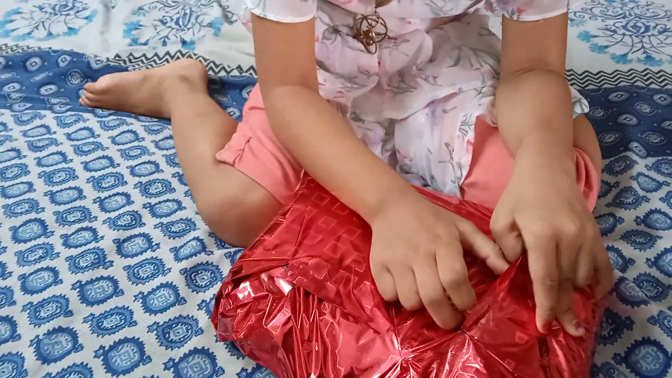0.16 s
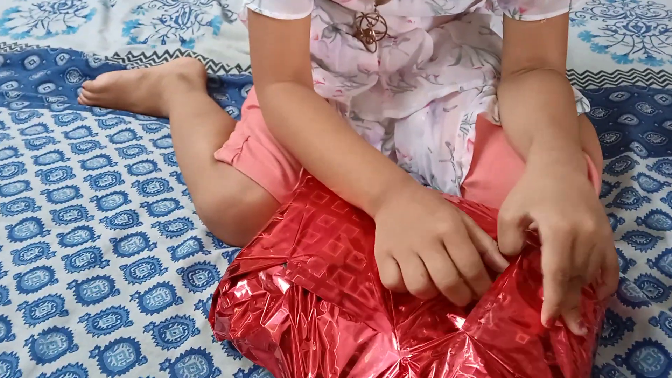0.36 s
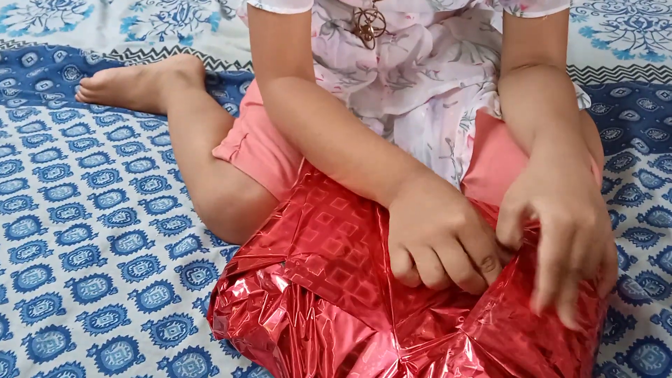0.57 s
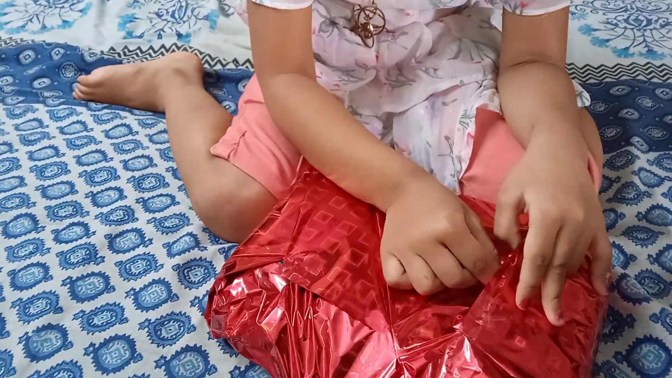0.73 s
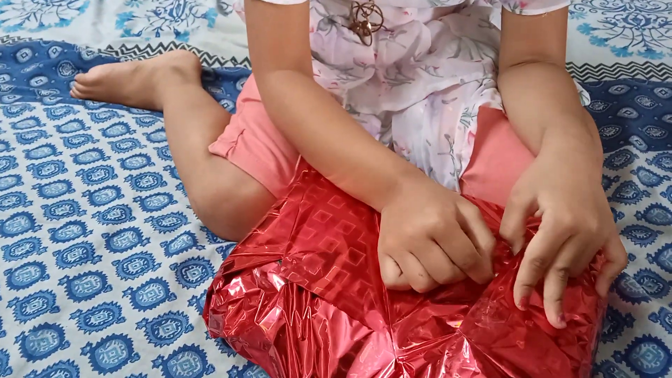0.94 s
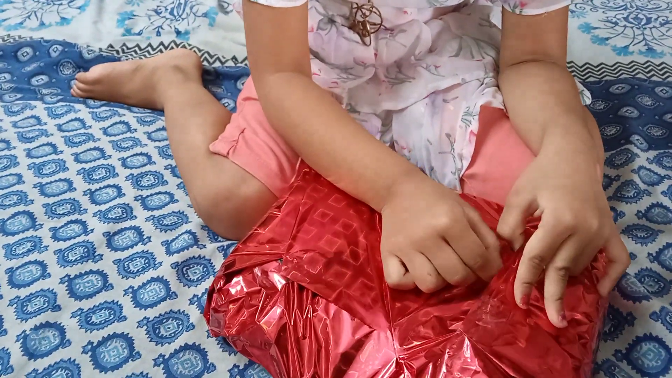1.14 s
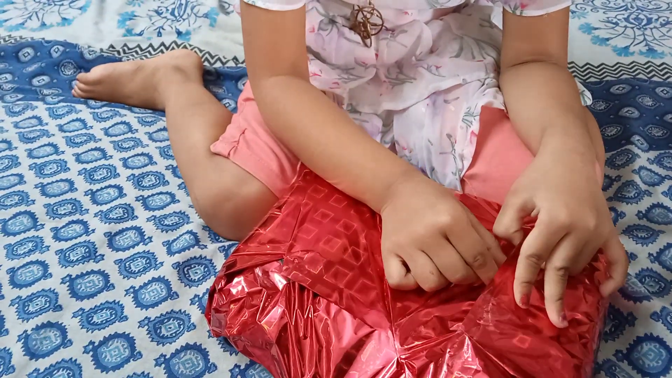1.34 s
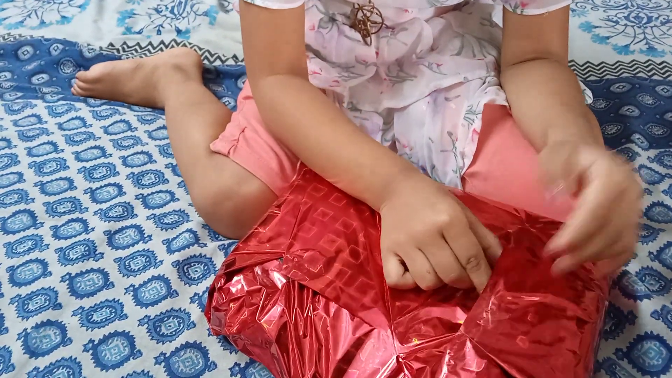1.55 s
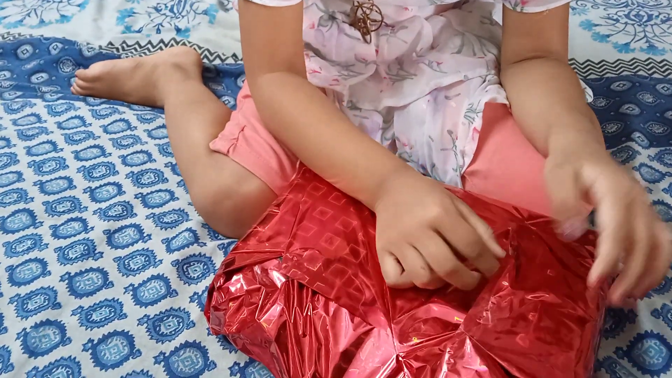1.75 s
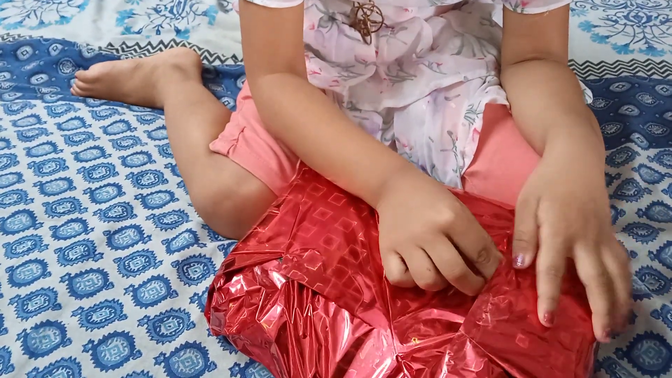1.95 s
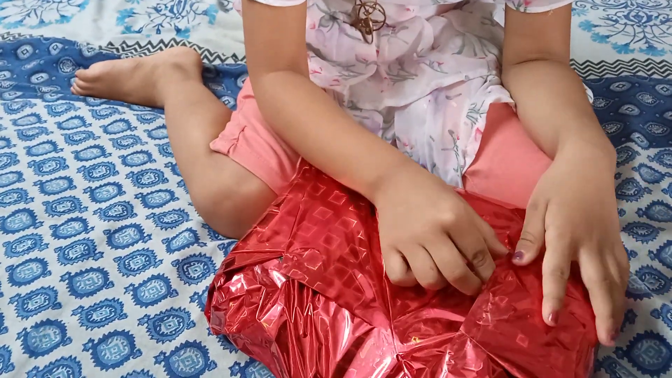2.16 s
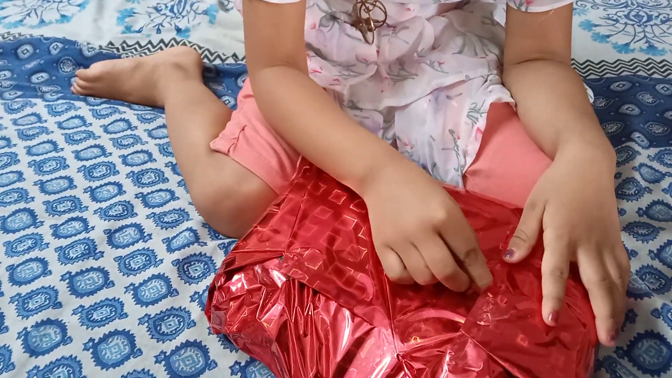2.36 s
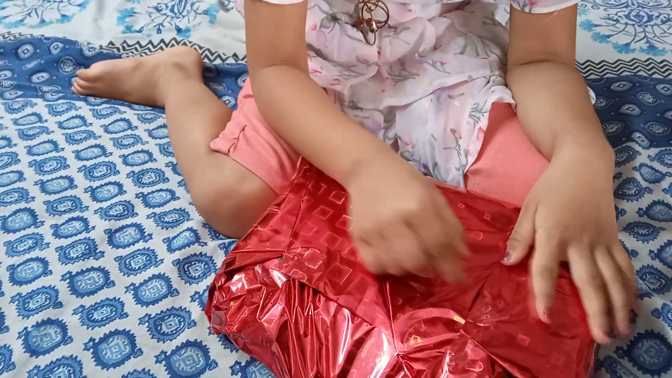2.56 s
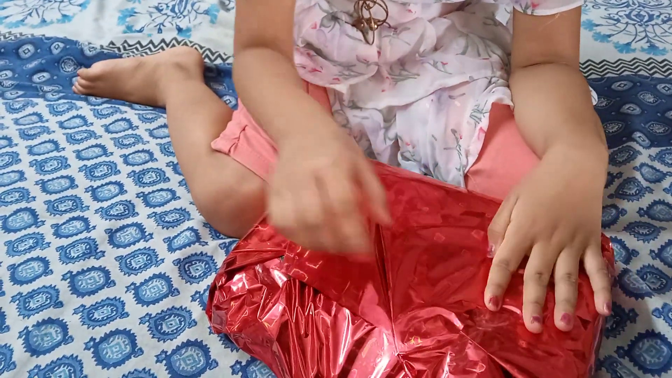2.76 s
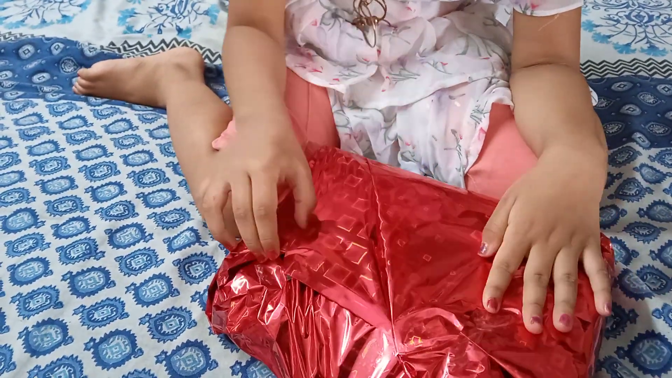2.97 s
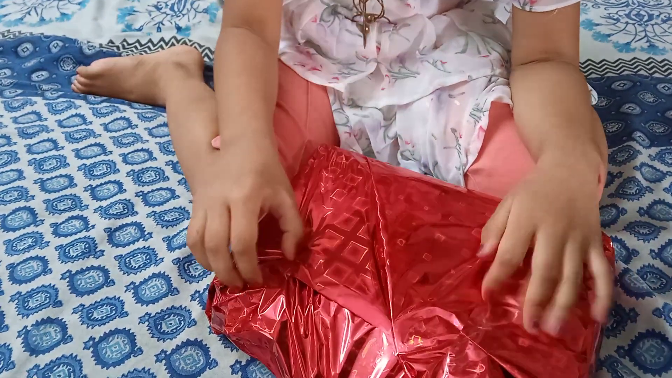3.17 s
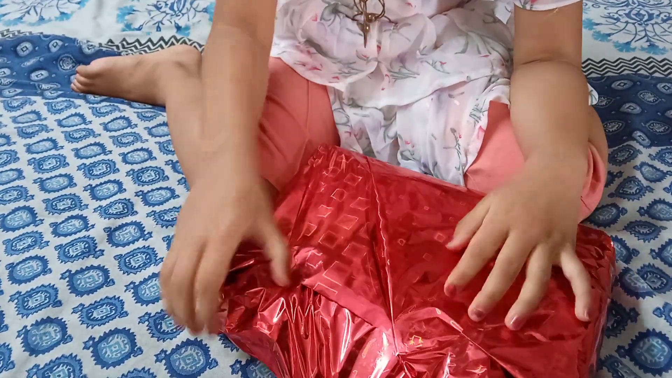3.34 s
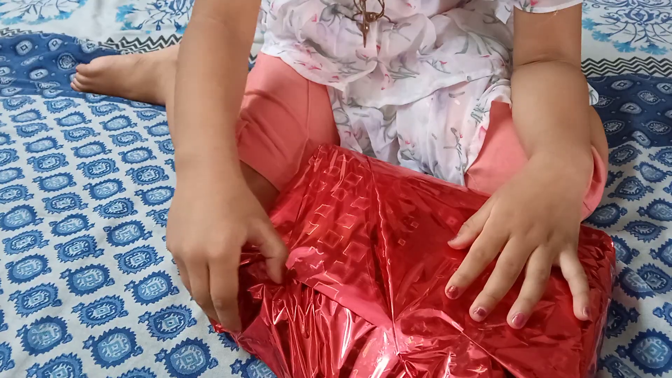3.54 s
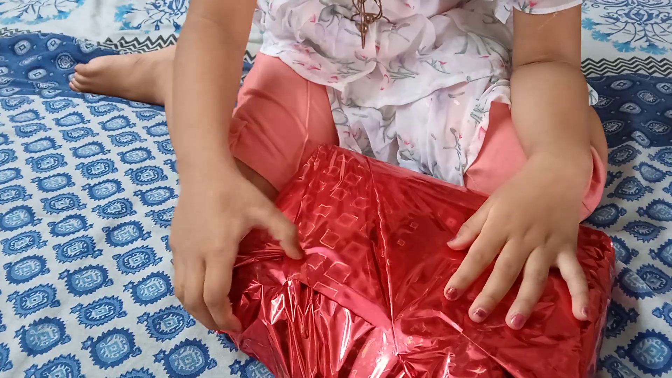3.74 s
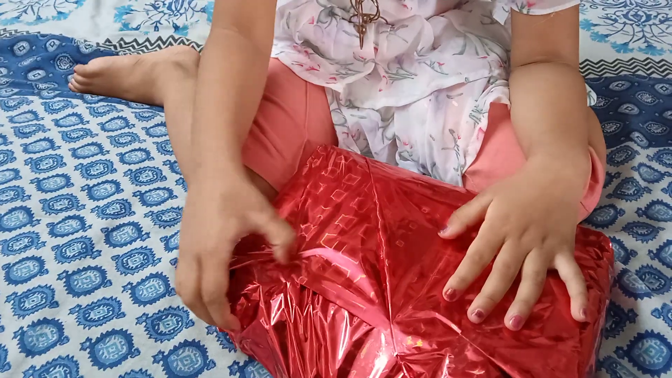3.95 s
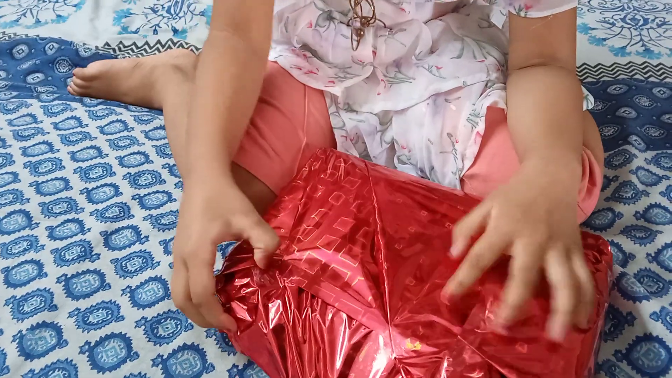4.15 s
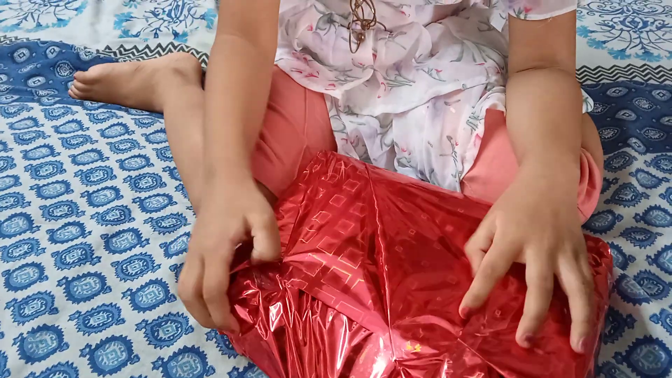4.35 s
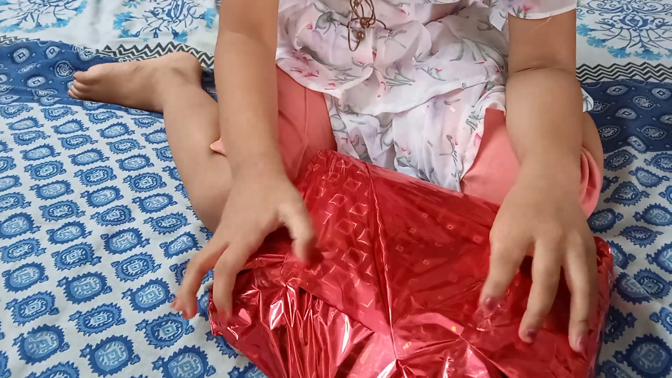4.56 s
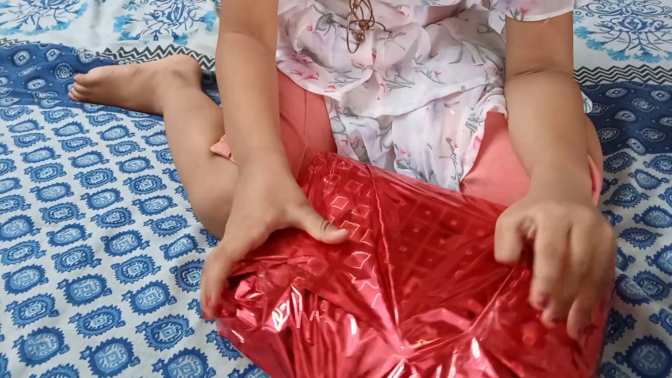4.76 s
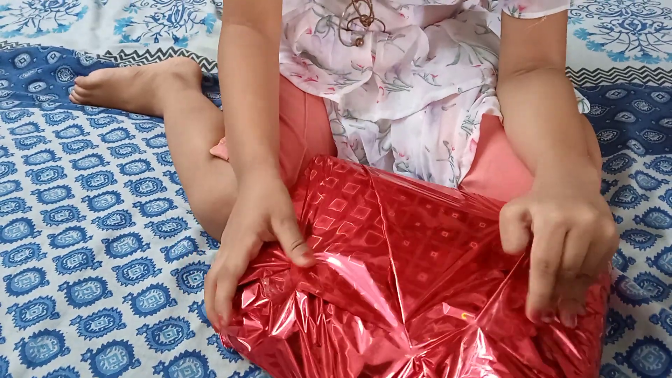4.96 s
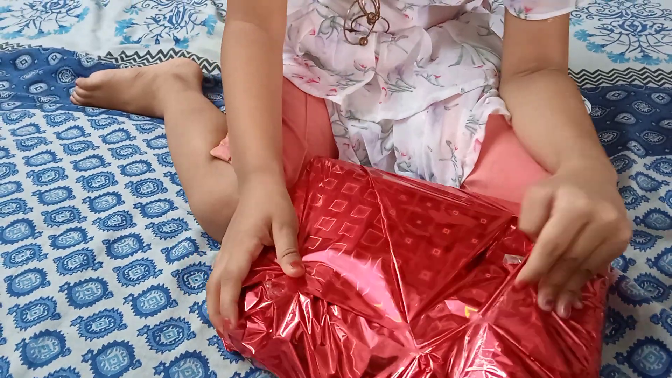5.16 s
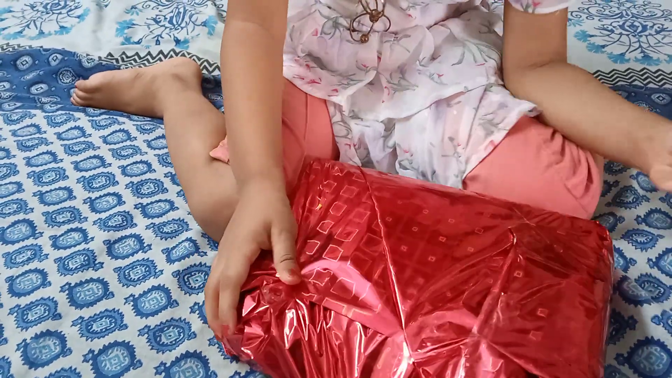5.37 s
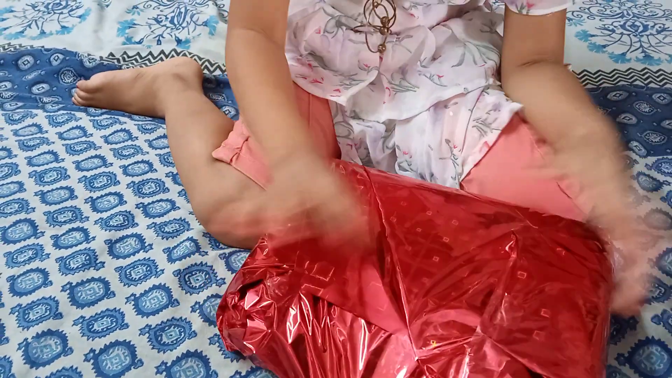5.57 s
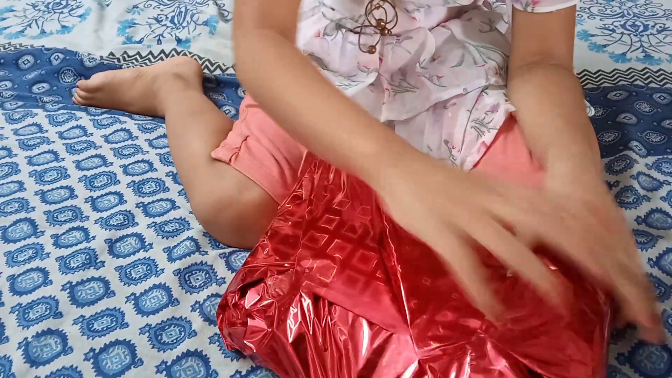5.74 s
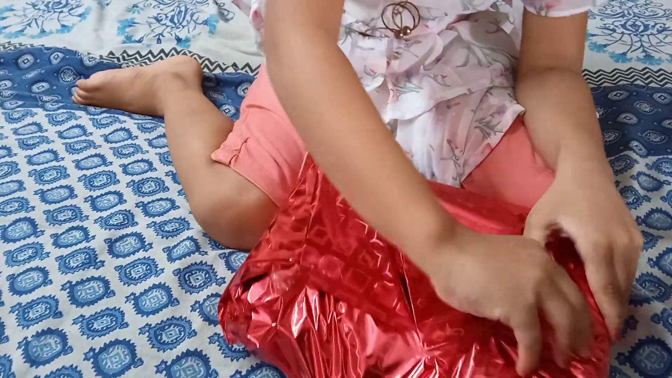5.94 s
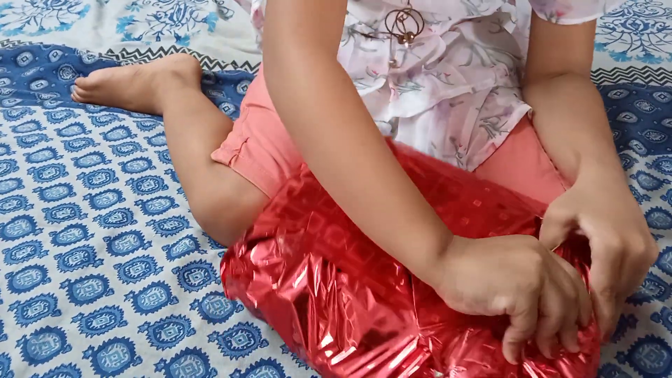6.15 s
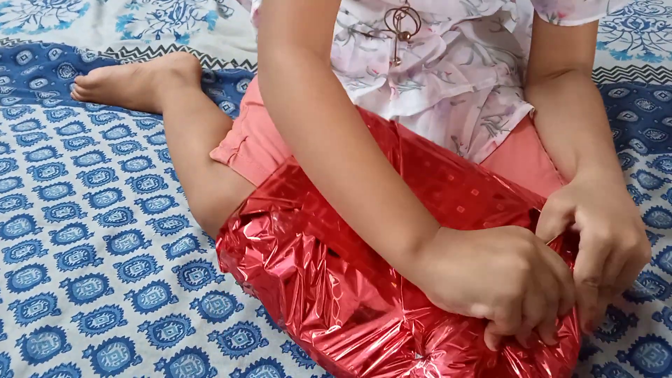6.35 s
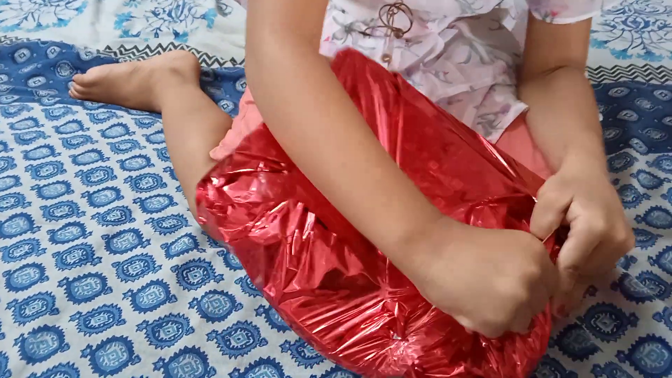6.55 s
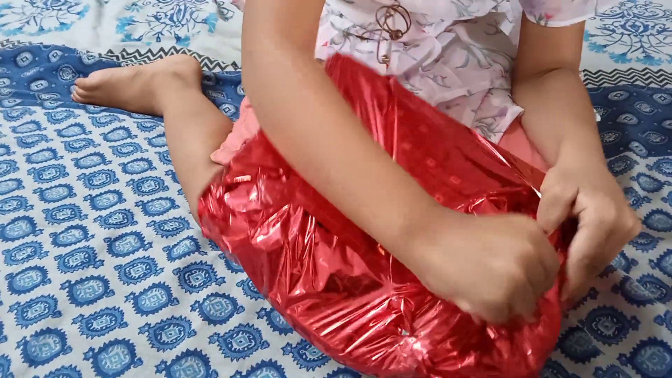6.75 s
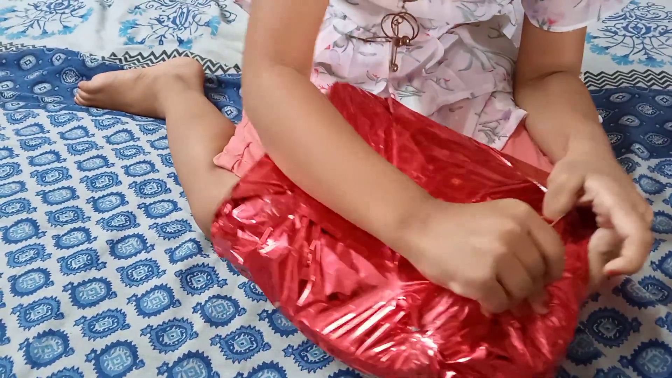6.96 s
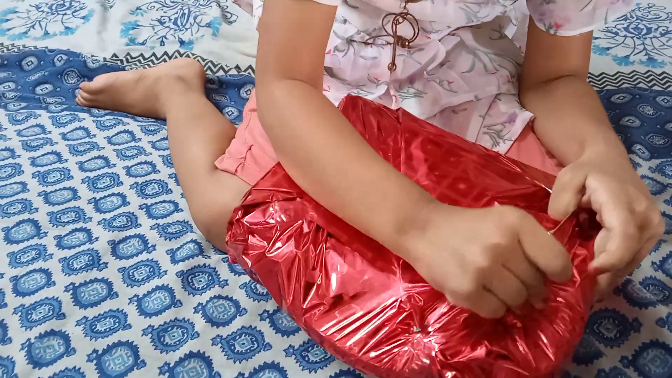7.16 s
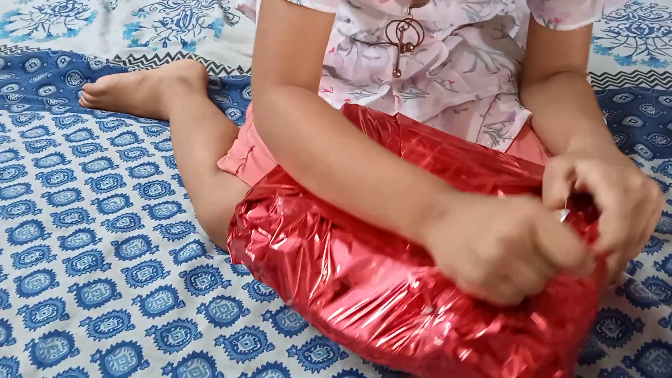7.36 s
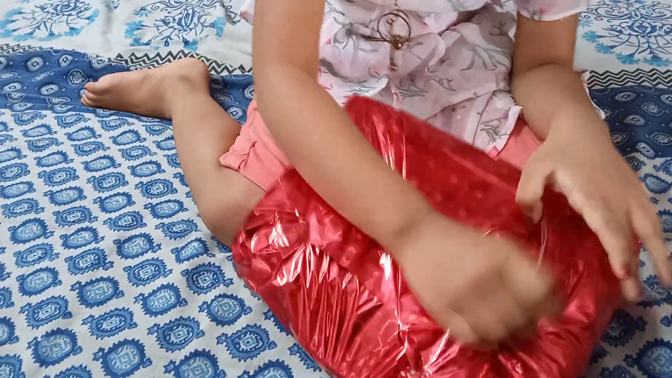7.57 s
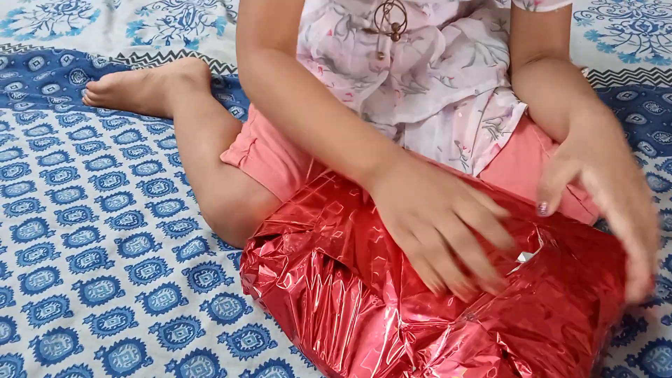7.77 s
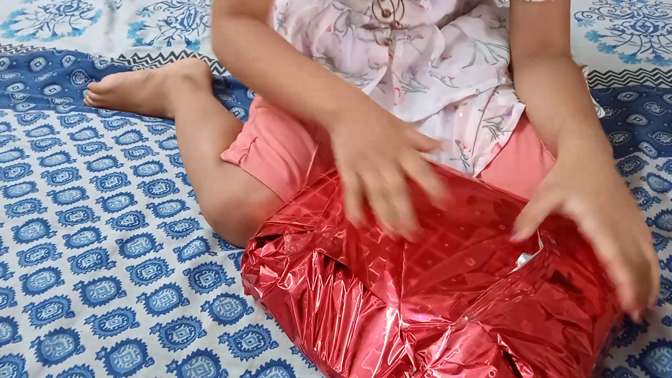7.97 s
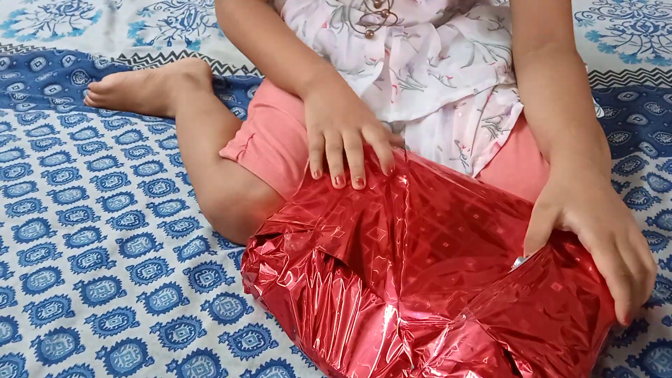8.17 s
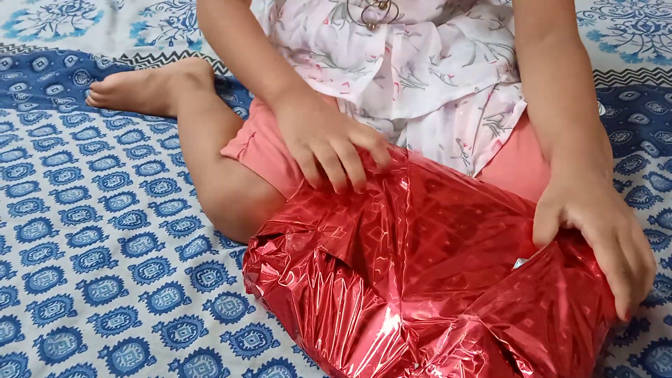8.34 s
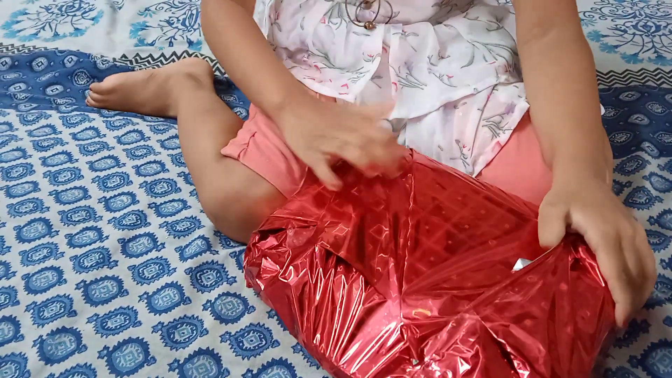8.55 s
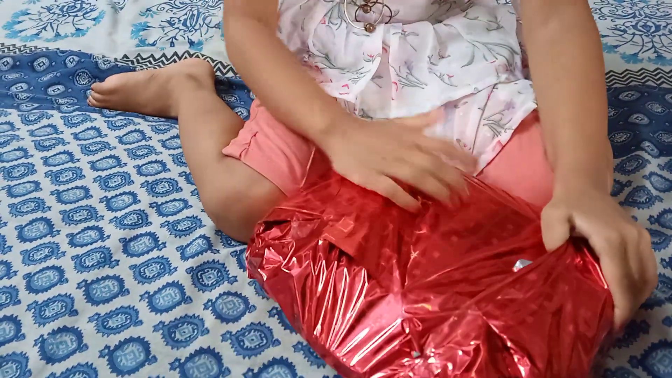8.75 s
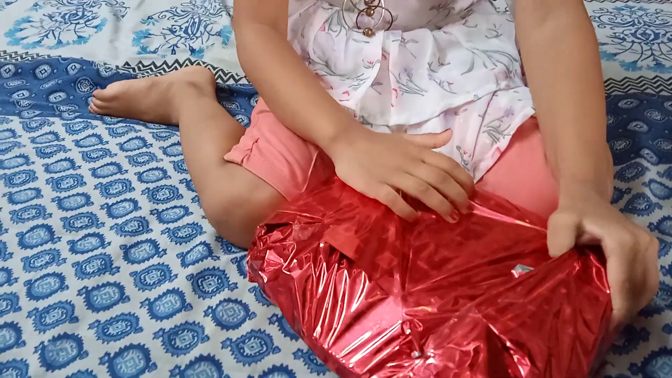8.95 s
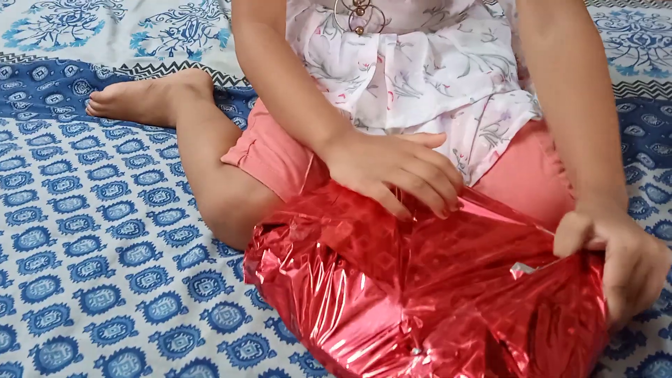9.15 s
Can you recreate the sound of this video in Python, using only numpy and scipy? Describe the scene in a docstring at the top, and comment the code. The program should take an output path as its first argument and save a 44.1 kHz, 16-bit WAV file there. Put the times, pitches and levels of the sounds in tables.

```python
"""A foil-wrapped parcel crackles in picking hands on a bed from the start, over a short opening drone
and dull rubs that come and go throughout. Random clicks make the creases: single sharp buckles over fine
crinkling. Shaped noise makes the rubs and the sliding hiss. Slack panels pop as short pulses that fall in
pitch, and once the stretched foil lets go with a loud snap. Late on, a fingertip judders over the taut wrap
as a run of plucks. All of it is close by in a small room, over quiet air noise and a wavering hum."""
import sys
import numpy as np
from scipy import signal
from scipy.fft import rfft, irfft, next_fast_len
from scipy.io import wavfile
from scipy.ndimage import uniform_filter1d, map_coordinates

SR = 44100
rng = np.random.default_rng(int(sys.argv[2]) if len(sys.argv) > 2 else 0)


def wav_out(sig):
    """Save sig, one row per channel (or a flat mono array), as 16-bit PCM at SR to the path in sys.argv[1]."""
    wavfile.write(sys.argv[1], SR, np.round(np.clip(np.atleast_2d(sig).T, -1, 1) * 32767).astype(np.int16))


N = 406161

SPLIT_HZ = 5200  # the foil's ring lies below, its treble above
# colour of the sheet smacking the parcel: f/Hz, level/dB per Hz (relative)
SMACK_COLOUR = [(60, -20), (300, -4.5), (550, -2.5), (950, 2.5), (1400, -0.5), (2200, -4), (4000, -9),
                (12000, -57)]


def amp(db):
    """Decibels to gain."""
    return 10 ** (np.asarray(db) / 20)


def unit(x):
    """Each row at rms 1."""
    return x / np.sqrt(np.mean(x ** 2, axis=-1, keepdims=True) + 1e-20)


def along(points, hz):
    """(Hz, value) points read on a log frequency axis."""
    f, v = np.transpose(points)
    return np.interp(np.log(hz + 1), np.log(f), v)


def wobble(rate):
    """A smooth random curve with rate knots a second."""
    knots = rng.standard_normal(int(N * rate / SR) + 4)
    return map_coordinates(knots, [np.arange(N) * rate / SR])


def filtered(x, response):
    """x through a filter given as a response over frequency."""
    m = next_fast_len(N + SR // 4)
    return irfft(rfft(x, m) * response(np.fft.rfftfreq(m, 1 / SR)), m)[:N]


def noise(spectrum):
    """Coloured noise of rms 1."""
    return unit(filtered(rng.standard_normal(N), lambda hz: amp(along(spectrum, hz))))


def treble(hz):
    """A smooth step from 0 to 1 just above the ring of the foil."""
    return 1 - 1 / (1 + (hz / SPLIT_HZ) ** 16)


def place(times, waves):
    """Sum rows of samples, each starting at its time."""
    starts = np.maximum(np.round(times * SR), 0).astype(int)
    index = starts[:, None] + np.arange(waves.shape[1])
    return np.bincount(index.ravel(), waves.ravel(), N)[:N]


def impulse(gain):
    """The spectrum of the sharpest causal click (minimum phase) that has this gain over frequency."""
    cepstrum = irfft(np.log(gain))
    size = cepstrum.shape[-1]
    fold = 1 + np.sign(size / 2 - np.arange(size))
    fold[0] = 1
    return np.exp(rfft(cepstrum * fold))


def gesture(start, length, build_db, rise_db_per_s, fall_db_per_s, swell_db, step=32):
    """Attack, sloping arched hold and release: one row of gain per gesture, one value every step samples."""
    t = np.arange(0, N, step) / SR - start[:, None]
    across = np.clip(t / length[:, None], 0, 1)
    arch = swell_db * (np.sin(np.pi * across) - 2 / np.pi)
    slope = np.reshape(build_db, (-1, 1)) * (across - .5)
    attack = rise_db_per_s * np.minimum(t, 0)
    release = fall_db_per_s * np.maximum(t - length[:, None], 0)
    return amp(arch + slope + attack - release)


def together(db, shapes, rest_db):
    """Gain per sample of all gestures, their powers added to a resting level."""
    gain = np.sqrt(amp(db) ** 2 @ shapes ** 2 + amp(rest_db) ** 2)
    return np.interp(np.linspace(0, len(gain) - 1, N), np.arange(len(gain)), gain)


def repeats(start, length, per_second, scatter_s):
    """The uneven times of a quick run of contacts, and how far through the run each falls (0-1)."""
    offset = np.arange(0, length, 1 / per_second)
    return start + offset + scatter_s * rng.standard_normal(len(offset)), offset / length


def background():
    """Quiet room noise with a faint hum that wavers in level and phase."""
    # room noise: f/Hz, level/dB per Hz (relative)
    air_colour = [(25, -35), (70, -1), (110, 2), (250, -18), (450, -14.5), (900, -14), (1500, -12),
                  (3000, -9), (8000, -42)]
    # the hum: f/Hz, rms level before wavering/dB
    hum_tone = (270, -73)
    hz, db = hum_tone
    hum = np.sqrt(2) * np.sin(2 * np.pi * hz * np.arange(N) / SR + 1.505 * wobble(18))
    return amp(-62) * noise(air_colour) + amp(db + 6.4 * wobble(7)) * hum


def rubbing(effort):
    """Uneven friction: dull on the bedsheet, papery where skin drags on the wrap."""
    # an arm or the parcel slides on the cloth:
    # start t/s, length t/s, dull level at half effort/dB, papery rasp against it/dB
    shifts = [(0.0, 0.095, -63, -2.5), (0.663, 0.194, -59, -3.5), (1.312, 0.277, -58, -14.5),
              (4.095, 0.051, -51.5, -4), (4.451, 0.196, -54, -9.5), (4.859, 0.15, -61, -2.5),
              (5.864, 0.0324, -46, -8.5), (5.92, 0.178, -53.5, -7.5), (6.581, 0.053, -59.5, 8),
              (6.788, 0.111, -53, -16), (7.516, 0.315, -55.5, -8.5), (8.347, 0.144, -51, -6.5),
              (8.576, 0.34, -56.5, -8.5), (8.943, 0.106, -56.5, -14.5), (9.176, 0.036, -62, 12.5)]
    # dull rub on cloth: f/Hz, level/dB per Hz (relative)
    cloth_colour = [(30, -46.5), (70, -8), (150, 0.5), (300, 0.5), (420, -4.5), (600, -13), (1200, -41.5),
                    (4000, -60)]
    # papery rub on the wrap: f/Hz, level/dB per Hz (relative)
    rasp_colour = [(300, -27.5), (550, -3), (850, 2.5), (1200, -6.5), (2000, -11), (4000, -34.5)]
    contact_db, contact_rasp_db = -58, -62  # light, constant rubbing of the hands, at half effort
    dull_span_db, rasp_span_db = 2, 7.5  # gain from no effort to full effort
    start, length, db, rasp_db = np.transpose(shifts)
    shapes = gesture(start, length, build_db=-4.5, rise_db_per_s=301, fall_db_per_s=196, swell_db=4.5)
    dull = together(db, shapes, contact_db) * amp(dull_span_db * (effort - .5))
    papery = together(db + rasp_db, shapes, contact_rasp_db) * amp(rasp_span_db * (effort - .5))
    slips = unit(amp(2.5 * wobble(70) + 1.165 * wobble(12)))
    return slips * (dull * noise(cloth_colour) + papery * noise(rasp_colour))


def drag():
    """A finger drags over the taut panel; friction feeds its lowest resonance, which drones."""
    # the drag: start t/s, length t/s, level/dB, pitch f/Hz, resonance width f/Hz
    drag_stroke = (0, 0.09, -58, 314.5, 105)
    start, length, db, centre_hz, width_hz = drag_stroke
    shape = gesture(np.array([start]), np.array([length]),
                    build_db=8, rise_db_per_s=500.5, fall_db_per_s=200, swell_db=2)

    def resonance(hz):
        """A band-pass resonance of the panel."""
        damping = 1j * hz * width_hz
        return damping / (centre_hz ** 2 - hz ** 2 + damping)

    drone = filtered(rng.standard_normal(N), resonance)
    return together(np.array([db]), shape, -120) * unit(drone)


def handling():
    """The strokes of the fingers as crinkle gain, treble gain and effort (0-1)."""
    # each grip, pull or push of the fingers: start t/s, length t/s, crinkle level/dB,
    # rise from start to end/dB, treble against the crinkle/dB
    finger_strokes = [(0.016, 0.173, -47.5, -3, -15), (0.313, 0.524, -48.5, 2, -13.5),
                      (0.874, 0.179, -52.0, 1, -14.5), (1.268, 0.071, -50.5, -5, -12.5),
                      (1.525, 0.086, -43.5, -7, -13.5), (1.699, 0.08, -53.5, -3, -15),
                      (1.836, 0.08, -51.5, 4, -12.5), (2.029, 0.077, -49.5, -7, -11),
                      (2.234, 0.131, -50.5, 0, -10.5), (2.567, 0.197, -52.5, -4, -12),
                      (2.792, 0.038, -48.0, 0, -11.5), (2.995, 0.07, -51.0, -0.5, -11),
                      (3.117, 0.19, -49.0, -2, -11), (3.364, 0.025, -42.0, 0, -19),
                      (3.51, 0.091, -47.0, -12, -12.5), (3.698, 0.167, -53.5, -1, -13),
                      (3.942, 0.372, -52.0, -1, -11.5), (4.409, 0.046, -53.5, -8, -2),
                      (4.507, 0.122, -43.5, 11, -14), (4.674, 0.211, -47.5, 12, -14),
                      (4.882, 0.468, -42.5, 4, -13), (5.469, 0.049, -43.0, 9, -17.5),
                      (5.546, 0.11, -52.5, 10, -15.5), (5.8, 0.081, -44.0, 5, -8.5),
                      (5.905, 0.221, -35.5, 10, -16), (6.155, 0.308, -41.0, 0, -12),
                      (6.491, 0.135, -38.5, -1.5, -13.5), (6.617, 0.092, -43.5, -6, -12),
                      (6.735, 0.189, -45.0, 0, -11), (6.995, 0.29, -47.5, 5, -14.5),
                      (7.306, 0.161, -38.5, -2, -16.5), (7.492, 0.188, -35.0, 2, -15),
                      (7.655, 0.129, -35.0, -4, -14), (7.809, 0.216, -51.0, -8, -15),
                      (8.055, 0.275, -48.5, 6, -11.5), (8.355, 0.2, -41.5, 0, -16),
                      (8.545, 0.149, -38.0, 2, -24.5), (8.736, 0.29, -42.0, -2, -17),
                      (9.045, 0.19, -37.5, 5, -15.5)]
    grip_db_per_s, release_db_per_s = 701, 480  # how fast a stroke takes hold and lets go
    swell_db, unsteady_db = 2, 0.6313  # strokes arch in the middle; the fingers pull unevenly
    settle_db, settle_db_per_s = -11, 110  # the sheet goes on settling after each stroke
    rest_db, rest_treble_db = -63, -10  # crinkle under resting hands, and its treble against it
    light_db, effort_range_db = -60, 26  # crinkle level at no effort; full effort lies this far above
    start, length, db, build_db, treble_db = np.transpose(finger_strokes)
    pull = gesture(start, length, build_db, grip_db_per_s, release_db_per_s, swell_db)
    settling = amp(settle_db) * gesture(start, length, build_db, grip_db_per_s, settle_db_per_s, swell_db)
    shapes = np.maximum(pull, settling)
    unsteady = amp(unsteady_db * wobble(22))
    body = unsteady * together(db, shapes, rest_db)
    top = unsteady * together(db + treble_db, shapes, rest_db + rest_treble_db)
    effort = np.clip((20 * np.log10(body) - light_db) / effort_range_db, 0, 1)
    return body, top, effort


def buckle(pitch, treble_db, ring_db, width, ripple_db, size=256):
    """One click per pitch: an impulse through the foil's colour and the crease's own broad resonance."""
    # colour of the foil: f/Hz, level/dB per Hz (relative)
    foil_colour = [(100, -22.5), (500, -24.5), (1200, -14.5), (1800, -6.5), (2400, -4.5), (3000, -2),
                   (3900, -5.5), (5000, -16), (6500, -12.5), (8300, -13), (11000, -23.5), (13500, -19),
                   (16000, -37)]
    hz = np.fft.rfftfreq(size, 1 / SR)
    chance = rng.standard_normal((len(pitch), len(hz) + 2))
    octaves = np.log2((hz + 1) / pitch[:, None])
    # every facet of the sheet has its own uneven overtones
    facets = unit(uniform_filter1d(chance[:, 2:], size=9, axis=1))
    ripple = ripple_db * facets * (0.764 + treble(hz))
    gain = amp(along(foil_colour, hz) + ring_db * np.exp(-(octaves / width) ** 2) + ripple)
    ring = unit(gain * (1 - treble(hz)))
    gain = ring + amp(treble_db)[:, None] * unit(gain * treble(hz))
    # a neighbouring fold gives way about a millisecond later, duller than the first
    lag = 0.0008007 * np.exp(0.3904 * chance[:, :1])
    strength = np.tanh(.65 * chance[:, 1:2])
    follower = strength * np.exp(-2j * np.pi * hz * lag) * (1 - treble(hz) / 2)
    return unit(irfft(impulse(gain) * (1 + follower)))


def crinkles(effort, per_second, idle_share, spread_db, bright_spread_db, clump_db):
    """Countless small uneven creases; more effort sets off more of them, and wider, lower ones."""
    count = int(per_second * N / SR)
    tally = np.cumsum(idle_share + effort ** 2)
    starts = np.searchsorted(tally, rng.random(count) * tally[-1])
    strength, tightness, brightness = rng.standard_normal((count, 3)).T
    sizes = amp(spread_db * np.minimum(strength, 2))
    treble_db = -21 + bright_spread_db * np.minimum(brightness, 2)
    ring_hz = 3300 * np.exp(0.1404 * tightness - 0.138 * effort[starts])
    clicks = buckle(ring_hz, treble_db, ring_db=12, width=0.381, ripple_db=4.0)
    stream = place(starts / SR, sizes[:, None] * clicks) * amp(clump_db * wobble(50))
    # a steady pull releases about the same energy in every tenth of a second
    power = np.abs(uniform_filter1d(stream ** 2, size=SR // 10))
    return stream / np.sqrt(power + 1e-12)


def rustle(body, top, effort):
    """Finger effort drives the crinkling; a hard pull or a gliding finger adds a hiss."""
    # skin glides over the foil without creasing it: centre t/s, half length t/s, extra treble level/dB
    skin_glides = [(0.261, 0.0092, 5.5), (1.731, 0.034, -3.5), (4.414, 0.0057, -2.5)]
    # hiss of sliding skin: f/Hz, level/dB per Hz (relative)
    slide_colour = [(530, -51), (900, -13), (1130, -34), (1490, -3), (1640, -11.5), (2860, -4.5),
                    (3820, -1.5), (5040, -19.5), (6410, -24.5), (8550, -17.5), (10000, -47.5), (13500, -36),
                    (16000, -36.5)]
    centre, half, extra_db = np.transpose(skin_glides)
    passes = np.exp(-((np.arange(N)[:, None] / SR - centre) / half) ** 4)
    glide = np.clip(passes.sum(axis=1), 0, 1)
    grains = crinkles(effort, per_second=500, idle_share=.15, spread_db=5.4, bright_spread_db=6, clump_db=2.5)
    hiss = amp(-17.5 + 8 * effort ** 2)
    sheet = (1 - glide) * grains + (hiss + glide) * noise(slide_colour)
    high = filtered(sheet, treble)
    low = body * amp(-0.3347) * unit(sheet - high)
    return low + top * amp(passes @ extra_db) * unit(high)


def crackles(count=3):
    """The large creases: wide folds ring low, tight ones high; each shakes a few small ones loose."""
    # large creases buckling: t/s, level over 3 ms/dB, pitch before it is spread below f/Hz,
    # treble against the ring/dB
    large_creases = [(0.046, -34, 3170, -14), (0.154, -21.5, 3020.0, -18.5), (0.2968, -36, 3080.0, -12.5),
                     (0.3053, -30.5, 3510, -10.5), (0.3318, -37.0, 3540.0, -2), (0.429, -35.5, 3390, -24),
                     (0.4626, -37.0, 2940, -23), (0.7537, -32.5, 3000, -17), (0.7997, -30.5, 3240, -20.5),
                     (0.9652, -35.5, 3610, -22), (1.0007, -38, 3370, -22.5), (1.0389, -37.5, 3260, -17),
                     (1.139, -44, 3300, -9), (1.1828, -42, 3130, -13), (1.2439, -41, 3340, -10.5),
                     (1.279, -32.5, 3020, -13.5), (1.3351, -37.5, 3170, -19), (1.3802, -42, 3400.0, -21.5),
                     (1.505, -37.5, 3330, -10.5), (1.573, -33.5, 3510, -11), (2.0564, -32, 2730, -20.5),
                     (2.2782, -38.5, 3300, -20.5), (2.4267, -43, 3070, -14.5), (2.4562, -38.0, 3310, -10),
                     (2.8367, -42, 2940.0, -12.5), (3.1159, -41, 3050.0, -15),
                     (3.1897, -38.5, 2860.0, -10.5), (3.2802, -37.0, 3110, -17.5), (3.391, -33, 2740, -8),
                     (3.5197, -32.5, 3055, -20), (3.5373, -31.5, 2930, -25.5), (3.5615, -36, 3120, -14),
                     (3.5835, -31, 3180, -17), (3.8318, -35.5, 2860, -13), (3.9495, -34, 2890, -22),
                     (4.0338, -40, 3170, -30), (4.209, -37.5, 3370.0, -10), (4.274, -39, 2820.0, -23.5),
                     (4.5159, -32.5, 3270, -12.5), (4.5635, -26, 3090, -18.5), (4.875, -34, 3180, -24),
                     (5.0341, -36, 3180, -7), (5.1311, -33.5, 3020, -14.5), (5.2395, -19, 3150, -14),
                     (5.2878, -29, 2970, -26.5), (5.3167, -21.5, 3200, -27), (5.3266, -14, 3665, -13),
                     (5.9136, -31, 3410.0, -8.5), (5.9323, -29, 3220, -12), (6.074, -25, 3300, -28),
                     (6.0831, -22.5, 2550, -17), (6.203, -33.5, 2950, -10.5), (6.3164, -23.5, 2670, -24.5),
                     (6.4833, -30.5, 2970, -13), (6.5503, -18.5, 2530, -24.5), (6.561, -35, 3140.0, -28),
                     (6.5902, -26.5, 2930, -12.5), (6.6137, -25.5, 2440, -20.5), (6.7826, -23.5, 3055, -20),
                     (6.8876, -31.5, 2810, -13.5), (7.022, -37, 2950, -13), (7.0776, -24.5, 2243, -47),
                     (7.1773, -28.5, 2790, -31.5), (7.3733, -20.5, 3175, -25.5), (7.5685, -25.5, 3080, -23),
                     (7.6649, -23.5, 2860, -27.5), (8.3588, -27, 3060.0, -15.5),
                     (8.5718, -23.5, 2900, -22.5), (8.5826, -24.5, 2880.0, -32.5),
                     (8.5917, -21.5, 2840, -35.5), (8.6168, -22.5, 3040, -28), (8.6362, -22.5, 2820, -31.5),
                     (8.6564, -25, 2800, -19.5), (8.676, -25, 2760, -20.5), (8.7196, -24.5, 2297, -29),
                     (8.914, -31.0, 3390, -4.5), (9.1725, -31, 3530, -5), (9.1799, -13.5, 3594, -13.5)]
    # small creases after a large one: mean gap/s, level against it/dB, loss/dB for each, first included
    after_gap_s, after_db, after_step_db = .003, -10, 4.5
    s, db, pitch, treble_db = np.transpose(large_creases)
    centre_hz = 3050
    ring_hz = centre_hz * (pitch / centre_hz) ** 1.6  # spreads the pitches about the centre
    clicks = buckle(ring_hz, treble_db, ring_db=12.5, width=0.584, ripple_db=2.0)
    out = place(s, amp(db - 3.0)[:, None] * clicks)
    gaps = rng.exponential(after_gap_s, (len(s), count))
    for k, delay in enumerate(np.cumsum(gaps, axis=1).T):
        clicks = buckle(ring_hz, treble_db, ring_db=10, width=0.44, ripple_db=3.0)
        small_db = db + after_db - after_step_db * (k + 1)
        out += place(s + delay, amp(small_db)[:, None] * clicks)
    return out


def flip(pitch, life):
    """A flipping panel pushes the air for a cycle or two, falling in pitch."""
    cycles = pitch[:, None] * np.arange(SR // 16) / SR
    swell = cycles / life
    phase = 2 * np.pi * (0.481 * cycles + 0.809 * (1 - np.exp(-cycles / 1.03)))
    push = np.gradient(np.cos(phase) * (swell * np.exp(1 - swell)) ** 2.43, axis=1)
    return push / np.abs(push).max(axis=1, keepdims=True)


def slaps(s, db, size=1024):
    """Sharp, dull smacks of the sheet against the parcel, each at its peak level."""
    hz = np.fft.rfftfreq(size, 1 / SR)
    smack = irfft(impulse(amp(along(SMACK_COLOUR, hz))))
    return place(s, amp(db)[:, None] * smack / np.abs(smack).max())


def pops():
    """Slack panels flip over, smack the parcel and flutter briefly."""
    # single panels flipping: t/s, peak level/dB, nominal pitch f/Hz,
    # slap level/dB (the smack peaks 25 dB above it, the flutter starts 3.5 dB above it)
    single_pops = [(0.668, -37.5, 324, -54), (1.574, -39.5, 133, -49.5), (3.172, -35, 136, -47.5),
                   (4.086, -54, 280, -50), (4.508, -34, 236, -72), (4.568, -37.5, 216, -54.5),
                   (4.789, -37.5, 164, -69.5), (7.658, -36.5, 241, -54.5), (8.629, -32, 199.4, -70),
                   (8.746, -32, 191, -65.5), (8.817, -35.5, 167, -58.5), (8.998, -40.5, 130, -78),
                   (9.108, -37, 136.5, -70)]
    s, db, pitch, slap_db = np.vstack([single_pops, flaps()]).T
    t = np.arange(SR // 16) / SR
    fade = amp(slap_db[:, None] + 3.5 - 60 * t / 0.0516)
    flutter = place(s + 0.00452, fade) * noise(SMACK_COLOUR)
    push = place(s, amp(db)[:, None] * flip(pitch, life=0.915))
    return push + slaps(s + 0.000966, slap_db + 25) + flutter


def snap():
    """The released sheet cracks, booms and flutters to rest."""
    # the stretched sheet snaps free: t/s, boom peak level/dB, nominal boom pitch f/Hz,
    # crack peak level/dB, shiver level before wavering and a 1.7 dB cut/dB, shiver t60/s
    release = (5.326, -24, 300, -7.5, -23, .2)
    # shivering sheet: f/Hz, level/dB per Hz (relative)
    shiver_colour = [(60, -17), (250, 2), (550, -2.5), (1000, -5.5), (1500, -1.5), (2100, -1.5), (3000, 10),
                     (4000, -7.5), (5000, -17), (8500, -19.5), (11000, -23.5), (16000, -23)]
    s, boom_db, boom_hz, crack_db, shiver_db, t60 = release
    start, t = np.array([s]), np.arange(N) / SR - s
    boom = place(start, amp(boom_db) * flip(np.array([boom_hz]), life=0.93))
    decay = amp(shiver_db - 60 * np.abs(t) / t60 + 1.6 * wobble(400) - 1.7)
    shiver = (t > 0) * decay * noise(shiver_colour)
    return boom + slaps(start, np.array([crack_db])) + shiver


def flaps():
    """Each tug sets off a run of pops that weaken, their pitch following the tension."""
    # a tugged panel flaps again and again: start t/s, length t/s, rate/flaps per s,
    # peak level at the start/dB, first nominal pitch f/Hz, last nominal pitch f/Hz
    flap_runs = [(6.637, 0.08, 46.8, -32, 254.6, 149.5), (6.773, 0.069, 55, -34.5, 187, 204),
                 (6.881, 0.109, 30, -34.5, 168.6, 150)]
    scatter_s, fade_db = 0.00152, 2.5  # uneven timing, loss over a run
    slap_db = -25  # slap level against the peak, as in the slap column of the pops
    rows = []
    for start, length, per_second, db, first_hz, last_hz in flap_runs:
        s, through = repeats(start, length, per_second, scatter_s)
        peak_db = db - fade_db * through + rng.normal(0, 1.24, len(s))
        pitch = first_hz + (last_hz - first_hz) * through
        rows.append(np.transpose([s, peak_db, pitch, peak_db + slap_db]))
    return np.vstack(rows)


def judder():
    """A fingertip sticks and slips: each slip plucks the taut panel, hardest in mid-slide."""
    # the slide: start t/s, length t/s, level in the middle before a 3.5 dB cut/dB
    slide_run = (8.322, .14, -34.5)
    # modes of the taut wrap over the parcel: f/Hz, mean level/dB, t60/s
    panel_modes = [(326, 3.5, 0.0205), (544, -2, 0.0099), (808, 1.5, 0.0244)]
    slips_per_s, scatter_s, arch_db = 68, 0.002034, 10.5  # rate, uneven timing, loss at the ends
    start, length, peak_db = slide_run
    s, through = repeats(start, length, slips_per_s, scatter_s)
    db = peak_db - arch_db * (2 * through - 1) ** 2
    t = np.arange(SR // 20) / SR
    ring = 0
    for hz, level, t60 in panel_modes:
        mode_db = level + rng.normal(0, 1.5, (len(s), 1))
        ring = ring + amp(mode_db - 60 * t / t60) * np.sin(2 * np.pi * hz * t)
    return place(s, amp(db - 3.5)[:, None] * ring)


def room(x):
    """A small room answers after 5 ms with decaying noise that dies fastest around 1 kHz."""
    # decay of the room: f/Hz, t60/s
    room_decay = [(150, 0.198), (1000, 0.086), (3000, 0.1456), (8000, 0.2), (15000, 0.257)]
    hz, t, z = signal.stft(rng.standard_normal(SR // 2), SR, nperseg=256)
    decay = amp(-60 * t / along(room_decay, hz)[:, None])
    tail = signal.istft(z * decay, SR, nperseg=256)[1]
    tail = np.pad(tail / np.linalg.norm(tail), (SR // 200, 0))
    return signal.fftconvolve(x, tail)[:N]


def scene():
    """The parcel close by, the room's answer and its quiet background."""
    low_cut_hz = 39.8  # the thin sheet radiates little below this
    body, top, effort = handling()
    parcel = crackles() + rustle(body, top, effort) + snap() + rubbing(effort) + pops() + judder() + drag()
    parcel = filtered(parcel, lambda hz: 1j * hz / (1j * hz + low_cut_hz))
    return (parcel + amp(-12.5) * room(parcel) + background())[None]


def record(dry):
    """A very steep low-pass ends the band."""
    top_hz = 15900
    return filtered(dry[0], lambda hz: 1 / (1 + (hz / top_hz) ** 120))[None]


dry = scene()
out = record(dry)
wav_out(out)
```